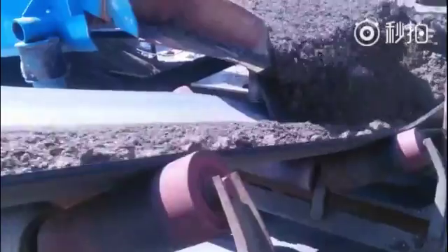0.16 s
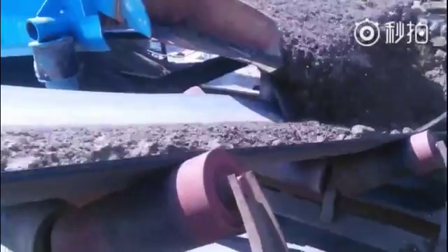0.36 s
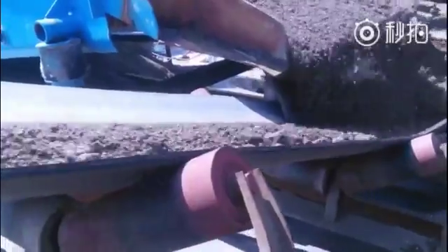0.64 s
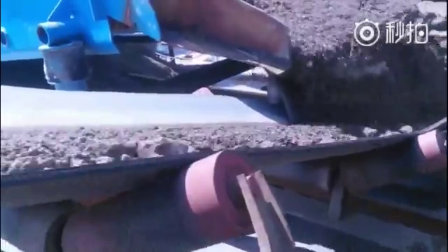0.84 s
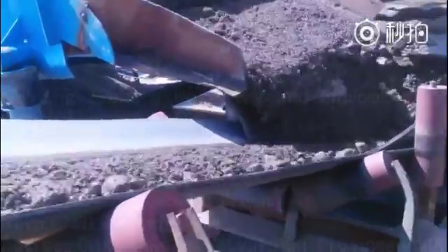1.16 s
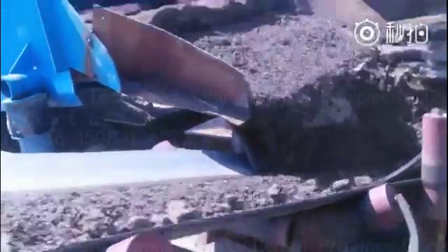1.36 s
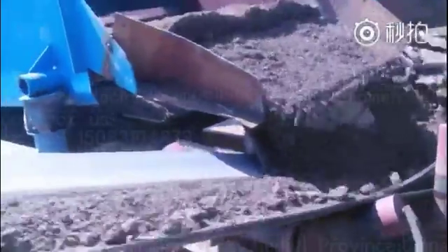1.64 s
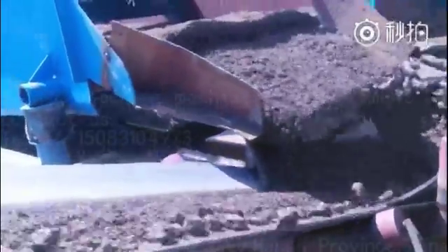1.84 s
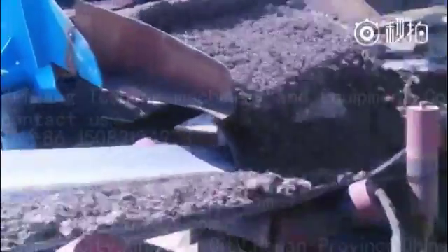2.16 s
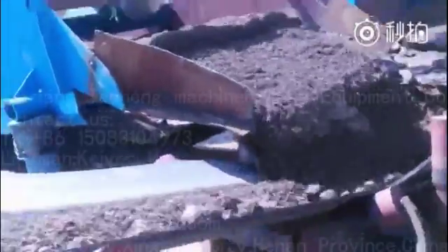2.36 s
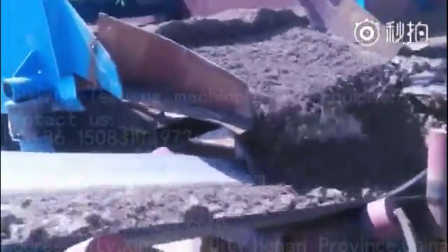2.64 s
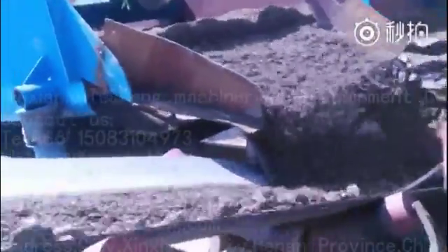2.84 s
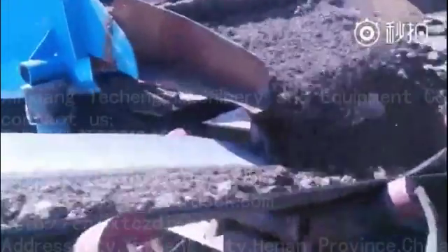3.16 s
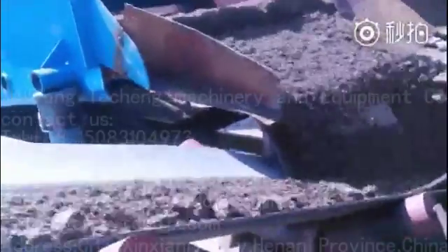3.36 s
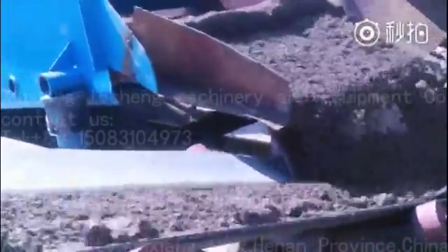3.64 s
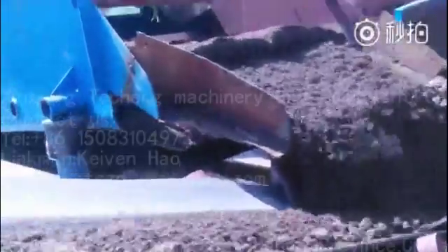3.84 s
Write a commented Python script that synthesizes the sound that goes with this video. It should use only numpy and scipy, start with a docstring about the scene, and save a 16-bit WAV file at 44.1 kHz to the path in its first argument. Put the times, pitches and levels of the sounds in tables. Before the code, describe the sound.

A vibrating screening machine starts abruptly into a dense, continuous rattle of stones on steel, heard close up outdoors. Beneath it the conveyor rumbles and the drive whines faintly, while heavier loads now and then tip over.

```python
"""Wet gravel clatters on the steel deck of a vibrating screen that shakes it onto a conveyor belt.
The deck throws the stones once a turn and drones on multiples of its stroke. Grit hisses, chute plates
ring and heavier loads tip over the lip, above a rumbling frame and a faintly whining drive.
A nearby plate reflects the clatter, so its colour shifts as the close, hand-held microphone moves.
The sound cuts in abruptly out of silence."""
import sys
import numpy as np
from scipy import signal
from scipy.fft import rfft, irfft
from scipy.io import wavfile
from scipy.ndimage import uniform_filter1d, map_coordinates

SR = 44100
rng = np.random.default_rng(int(sys.argv[2]) if len(sys.argv) > 2 else 0)


def unload_audio(sound):
    """Save the sound as a 16-bit wav file, at the path given as the first command line argument."""
    columns = np.transpose(np.atleast_2d(sound))
    # keep every value between -1 and 1, then stretch to whole-number steps
    steps = np.round(np.clip(columns, -1, 1) * 32767)
    wavfile.write(sys.argv[1], SR, steps.astype(np.int16))


N = 176400

# tone colour of stones on the steel deck (frequency [Hz], relative level [dB])
STONE_COLOUR = [(100, -26.5), (350, -11.5), (490, -5.5), (610, -1), (780, 0), (960, -1.5), (1300, -1.5),
                (1650, -.5), (2100, -1.5), (2600, -4), (3200, -7.5), (4000, -10.5), (5400, -17),
                (7500, -26.5), (10000, -30)]
# treble lift on the clatter (time [s], gain [dB])
TREBLE_LIFT = [(.4, .3), (1, -0.057), (1.3, -0.034), (2.1, 0.037), (2.8, 0.17), (3.4, -0.29), (4, 0.61)]
# tone colour of the sliding grit (frequency [Hz], relative level [dB])
GRIT_COLOUR = [(1000, -26), (3000, 2), (5000, -6), (6300, 0.5), (7500, 0.5), (8300, 2), (9300, 5.5),
               (10000, -8.5)]
# higher ringing plate of the chute (time [s], centre [Hz], level [dB])
HIGH_PLATE_RING = [(.4, 2160, -39), (.68, 2112, -36), (.85, 2099, -21), (1.2, 2070, -22),
                   (1.4, 2001, -24.5), (1.6, 1987, -21), (1.85, 1876, -23.5), (2.25, 2002, -20.5),
                   (2.45, 1796, -22.5), (3.1, 1816, -25.5), (3.4, 1710, -41), (4, 1692, -35)]
# lower ringing plate of the chute (time [s], centre [Hz], level [dB])
LOW_PLATE_RING = [(.4, 1460, -26), (1, 1441, -26), (1.5, 1387, -28), (1.85, 1254, -24), (2.2, 1402, -30),
                  (3.079, 1348, -36), (3.16, 1255, -24), (3.68, 1225, -22.5), (4, 1174, -31)]
# slap off the nearby plate (time [s], delay [ms], gain [ratio])
PLATE_SLAP = [(.4, 1.46, .2), (1.1, 1.42, .26), (1.45, 1.47, .16), (1.8, 1.6, .17), (2.1, 1.46, .22),
              (2.27, 1.46, .24), (2.32, 1.25, .22), (2.85, 1.35, .18), (3.08, 1.3, .16), (3.16, 1.68, .22),
              (3.6, 1.76, .22), (4, 1.8, .18)]
# loads tipping over the lip (peak time [s], rise [s], fall [s], ring [Hz], width [Hz], level [dB])
SPILL_HITS = [(.52, 0.042, 0.13, 2760, 300, -24), (.79, .03, 0.018, 250, 120, -20.5),
              (.9, 0.35, .3, 3200, 1300, -31), (1.07, .05, 0.044, 1420, 250, -24),
              (1.24, .008, .03, 2520, 400, -24.5), (2.33, 0.046, .12, 780, 280, -23.5),
              (2.35, 0.035, .08, 350.3, 150, -24), (2.39, 0.045, 0.054, 1650, 280, -23),
              (2.71, 0.013, 0.017, 735, 280, -22)]
# deck drone at the moving microphone (time [s], level of each stroke multiple from 3 to 7 [dB])
DRONE_LEVELS = [(0.4, -38, -31, -32, -35, -38), (0.9, -31, -34, -29, -34, -36),
                (1.35, -28, -35, -29, -31, -36), (1.75, -27, -31, -28, -29, -36),
                (2.0, -26, -28, -31, -33, -38), (2.3, -25, -27, -35, -43, -44),
                (2.62, -25, -23.5, -46, -48, -52), (2.9, -26, -24.5, -34, -35, -41),
                (3.35, -27, -25, -31, -29, -36), (3.65, -29, -28, -30, -31, -34),
                (3.95, -31, -27, -30, -31, -34)]
# weaker overtones of the deck (multiple [strokes], level [dB])
DRONE_OVERTONES = [(8, -34.5), (9, -34.5), (10, -37), (12, -45), (13, -41)]
# how late the deck's throb reaches the microphone (time [s], lag [turns])
THROB_DELAY = [(1.4, -.15), (2, .1), (2.4, .17), (3, .06)]
# tone colour of the frame and belt (frequency [Hz], relative level [dB])
RUMBLE_COLOUR = [(15, -24), (34, -20), (60, -3), (110, -4.5), (165, -2), (230, -0.5), (320, -1.5),
                 (400, -4.5), (480, -12.5), (700, -16.5), (2000, -68)]
# rumble of the frame and belt (time [s], level [dB])
RUMBLE_LEVEL = [(.4, -22.5), (1.3, -22.5), (1.8, -21.5), (2.4, -21.5), (2.7, -21.5), (3, -23), (3.4, -21),
                (4, -21)]
# motor whine at the moving microphone (time [s], level [dB])
MOTOR_LEVEL = [(.4, -37), (.7, -32), (1.6, -31.5), (2.55, -34.5), (2.9, -31), (3.3, -32), (3.55, -40),
               (4, -35)]
# whines of the bearings and rollers (pitch [Hz], level [dB], pitch drift [Hz])
BEARING_WHINES = [(221, -37.5, 1), (275, -35.5, 2), (384, -39, 2), (571, -38, 1.2), (578, -36.5, 1.2),
                  (603, -39.5, 1.5), (749, -39, 2), (861, -39.5, 1.5), (1009, -38, 2.5), (3437, -45, 8)]

STROKE_HZ = 16.56  # one turn of the screen is one stroke


def stones(level_db=-16, flicker_db=.47, treble_hz=2400):
    """Stones land on the deck: near ones tick, far ones merge; the treble follows the microphone's aim."""
    ticks = impacts(per_s=4200, spread_db=4)
    wash = rng.standard_normal(N)
    hits = steel_ring(shimmer(ticks + wash, depth_db=1.14))
    hits *= stroke_pulse(depth_db=.6, peak_turn=.27)
    clatter = unit(filtered(hits, body(STONE_COLOUR)))
    treble = filtered(clatter, np.clip((grid() - treble_hz) / 600 + .5, 0, 1))
    lift_db, = curves(TREBLE_LIFT)
    clatter += (amp(lift_db) - 1) * treble
    return amp(level_db + flicker_db * wobble(21.95)) * clatter


def steel_ring(x, t60_s=.3, ring_db=-19):
    """The surrounding steel adds a short, dense ring to each hit."""
    t = np.arange(SR // 4) / SR
    tail = rng.standard_normal(len(t)) * amp(-60 * t / t60_s)
    return x + amp(ring_db) * signal.fftconvolve(x, tail / np.linalg.norm(tail))[:N]


def grit(level_db=-30.5, flicker_db=.66):
    """Fine grit hisses off the deck, swelling a little with each stroke."""
    grains = shimmer(impacts(per_s=9000, spread_db=0), depth_db=1.4)
    grains *= stroke_pulse(depth_db=1.05, peak_turn=.16)
    hiss = unit(filtered(grains, body(GRIT_COLOUR)))
    return amp(level_db + flicker_db * wobble(22)) * hiss


def chute():
    """Stones ring two damped steel plates; each ring slides in pitch as the microphone moves."""
    high_hz, high_db = curves(HIGH_PLATE_RING)
    low_hz, low_db = curves(LOW_PLATE_RING)
    high = amp(high_db) * pelted_steel(high_hz, width_hz=520)
    low = amp(low_db) * pelted_steel(low_hz, width_hz=330)
    return high + low


def pelted_steel(hz, width_hz):
    """A damped steel resonance, rms 1, rung by a shower of stones."""
    damping = 1 / (1 + 1j * grid() / width_hz) ** 3
    showers = [unit(filtered(impacts(per_s=1800, spread_db=2.5), damping)) for _ in range(2)]
    phase = 2 * np.pi * np.cumsum(hz * np.ones(N)) / SR
    return showers[0] * np.cos(phase) + showers[1] * np.sin(phase)


def plate_reflection(x, cutoff_hz=3500):
    """A nearby plate adds one dull slap, which combs the sound as the microphone moves."""
    delay_ms, gain = curves(PLATE_SLAP)
    dull = filtered(x, 1 / (1 + (grid() / cutoff_hz) ** 4))
    slap = map_coordinates(dull, [np.arange(N) - delay_ms * SR / 1000])
    return x + gain * slap


def spills():
    """Now and then a heavier load swells and fades, rattling one part of the steel."""
    rattles = np.zeros(N)
    for peak_s, rise_s, fall_s, hz, width_hz, db in SPILL_HITS:
        t = clock() - peak_s
        swell = np.exp(-(t / np.where(t < 0, rise_s, fall_s)) ** 2 / 2)
        rattles += amp(db) * swell * pelted_steel(hz, width_hz)
    return rattles


def deck_drone(waver_db=.5, overtone_waver_db=1.5, slip_turns=.13):
    """The deck pumps air on multiples of its stroke; higher ones lag and slip, smearing the throb."""
    turns = STROKE_HZ * clock()
    throb_lag, = curves(THROB_DELAY)
    drone = np.zeros(N)
    for k, db in enumerate(curves(DRONE_LEVELS), 3):
        smear = .115 * k * k / 2
        phase = k * turns - smear - (k - 4) * throb_lag
        drone += amp(db + waver_db * wobble(6)) * np.sqrt(2) * np.sin(2 * np.pi * phase)
    for k, db in DRONE_OVERTONES:
        gain = amp(db + overtone_waver_db * wobble(4.6))
        drone += gain * tone(k * turns + slip_turns * wobble(6))
    return drone


def frame_rumble():
    """The frame and belt rumble under the load, a low bed of noise."""
    level_db, = curves(RUMBLE_LEVEL)
    return amp(level_db) * unit(filtered(rng.standard_normal(N), body(RUMBLE_COLOUR)))


def drive_whine(motor_hz=715, motor_drift_hz=1.5, waver_db=1.2):
    """Motor, bearings and rollers sing faintly, each a little unsteady in pitch and level."""
    motor_db, = curves(MOTOR_LEVEL)
    whine = np.zeros(N)
    for hz, db, drift_hz in [(motor_hz, motor_db, motor_drift_hz), *BEARING_WHINES]:
        gain = amp(db + waver_db * wobble(12))
        pitch_hz = hz + drift_hz * wobble(35)
        whine += gain * tone(np.cumsum(pitch_hz) / SR)
    return whine


def impacts(per_s, spread_db):
    """A shower of random clicks, rms 1; spread_db scatters their strength."""
    size = amp(spread_db * np.clip(rng.standard_normal(N), -2, 2))
    lands = rng.random(N) < per_s / SR
    return unit(lands * size * rng.choice([-1, 1], N))


def stroke_pulse(depth_db, peak_turn):
    """A tremolo that swells once per stroke of the screen."""
    return amp(depth_db * np.cos(2 * np.pi * (STROKE_HZ * clock() - peak_turn)))


def shimmer(x, depth_db):
    """x at rms 1, its colour flickering at random from moment to moment."""
    spectra = signal.stft(x, nperseg=512)[2]
    patches = uniform_filter1d(rng.standard_normal(spectra.shape), size=4, axis=0)  # across frequency
    patches = uniform_filter1d(patches, size=8, axis=1)  # across time
    return unit(signal.istft(spectra * amp(depth_db * unit(patches)))[1][:N])


def body(colour):
    """A minimum-phase EQ curve through points of (frequency [Hz], level [dB])."""
    hz, db = np.transpose(colour)
    gain = amp(np.interp(np.log(grid() + 1), np.log(hz + 1), db))
    cepstrum = irfft(np.log(gain))
    cepstrum[1:N] *= 2
    cepstrum[N + 1:] = 0
    return np.exp(rfft(cepstrum))


def filtered(x, response):
    """x through an EQ curve on the frequency grid."""
    return irfft(rfft(x, 2 * N) * response)[:N]


def tone(turns):
    """A sine of rms 1 with a random starting phase."""
    return np.sqrt(2) * np.sin(2 * np.pi * (turns + rng.random()))


def wobble(knots_per_s):
    """A smooth random modulation."""
    return map_coordinates(rng.standard_normal(1024), [clock() * knots_per_s], mode="mirror")


def curves(rows):
    """One automation curve for each column after the time."""
    times, *columns = np.transpose(rows)
    return [np.interp(clock(), times, column) for column in columns]


def amp(db):
    """Decibels to gain."""
    return 10 ** (np.asarray(db) / 20)


def unit(x):
    """x at rms 1."""
    return x / np.sqrt(np.mean(x ** 2) + 1e-20)


def clock():
    """The time of each sample [s]."""
    return np.arange(N) / SR


def grid():
    """Frequencies of the padded transform [Hz]."""
    return np.fft.rfftfreq(2 * N, 1 / SR)


def scene():
    """The mono mix: gravel and its reflection up front, the machine underneath."""
    gravel = plate_reflection(stones() + grit() + chute()) + spills()
    machine = frame_rumble() + deck_drone() + drive_whine()
    return (gravel + machine)[None]


def record(dry, start_s=.391, fade_s=.002, ceiling=.85, knee=5, top_hz=9720):
    """The sound cuts in and out abruptly, with its highest peaks rounded and a steep high cut."""
    t = clock()
    gated = dry[0] * np.clip(np.minimum(t - start_s, t[-1] - t) / fade_s, 0, 1)
    rounded = gated / (1 + np.abs(gated / ceiling) ** knee) ** (1 / knee)
    high_cut = np.clip((top_hz - grid()) / 100 + .5, 0, 1)
    return filtered(rounded, high_cut)[None]


dry = scene()
out = record(dry)
unload_audio(out)
```